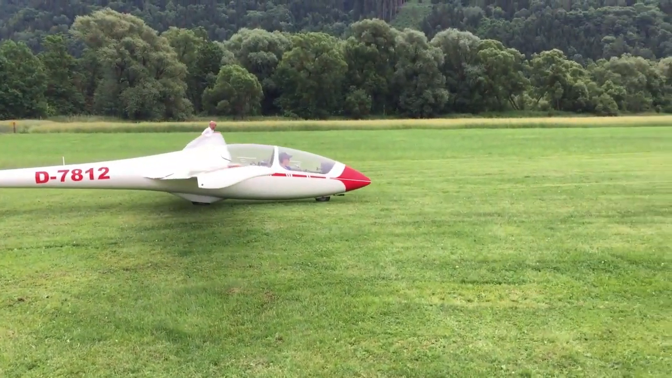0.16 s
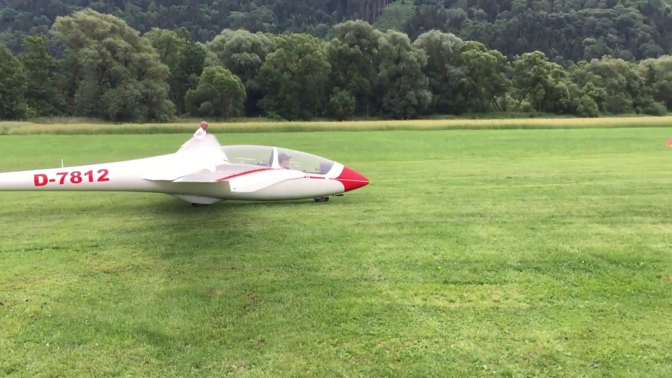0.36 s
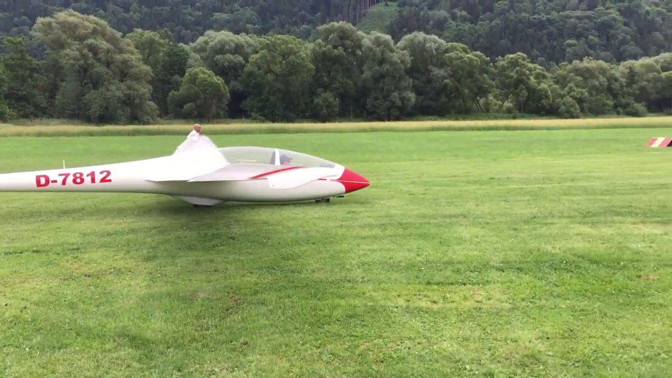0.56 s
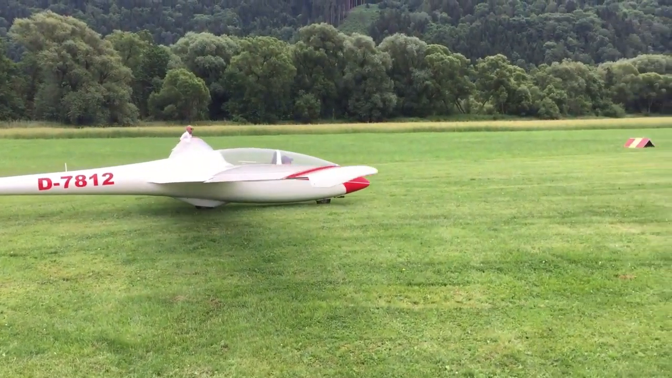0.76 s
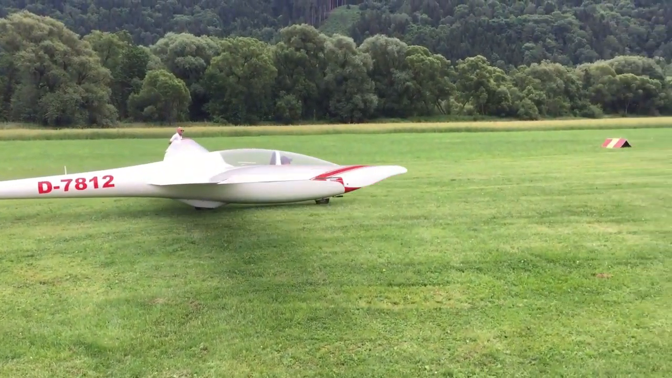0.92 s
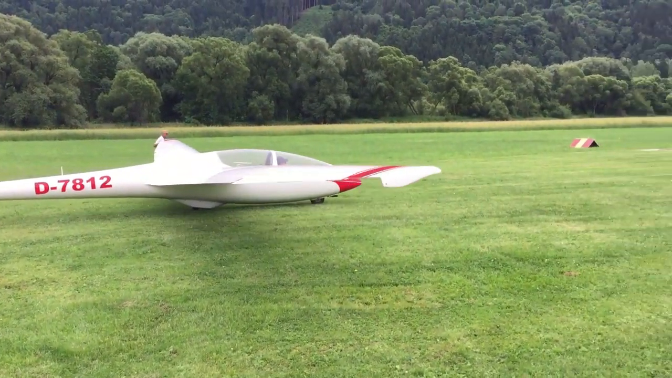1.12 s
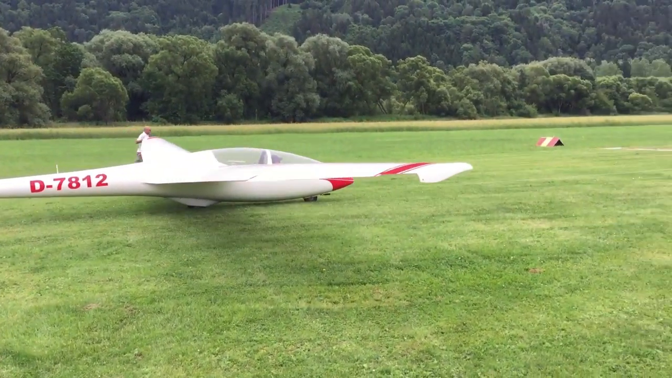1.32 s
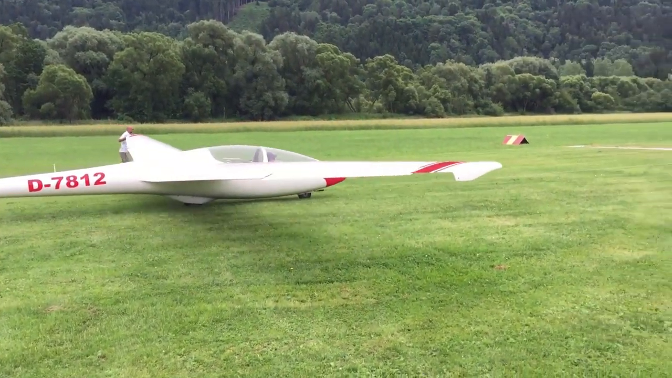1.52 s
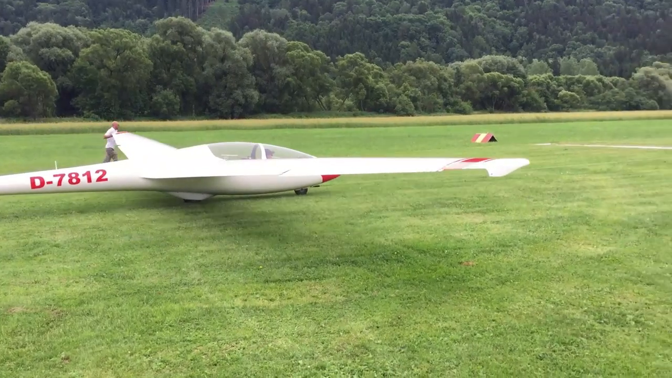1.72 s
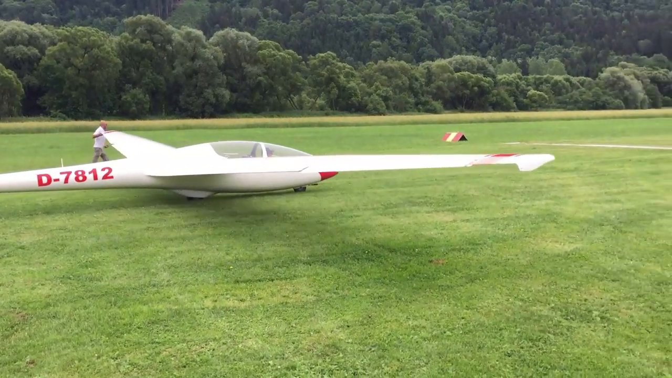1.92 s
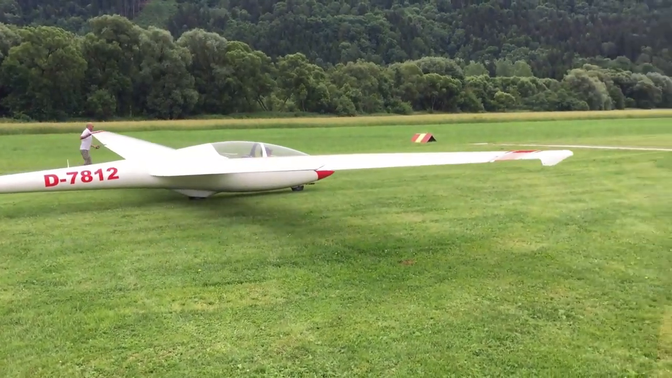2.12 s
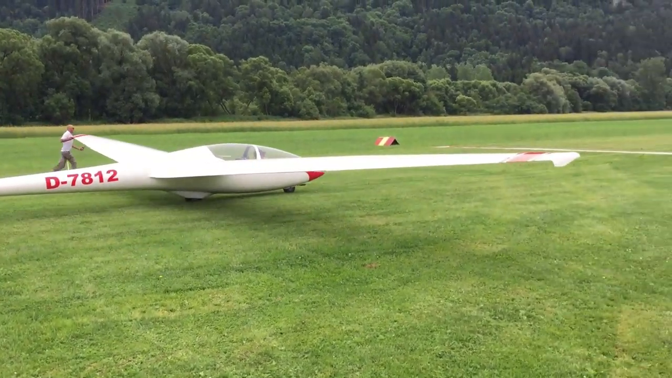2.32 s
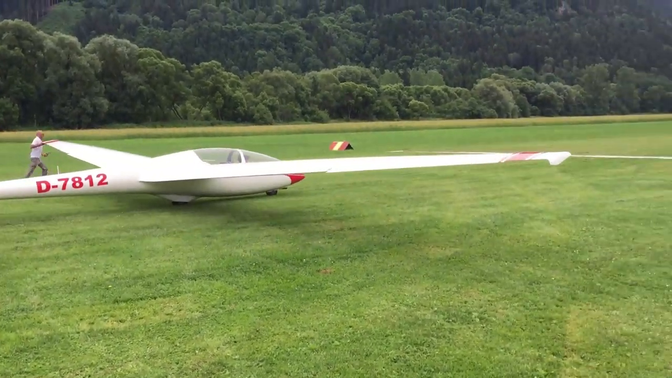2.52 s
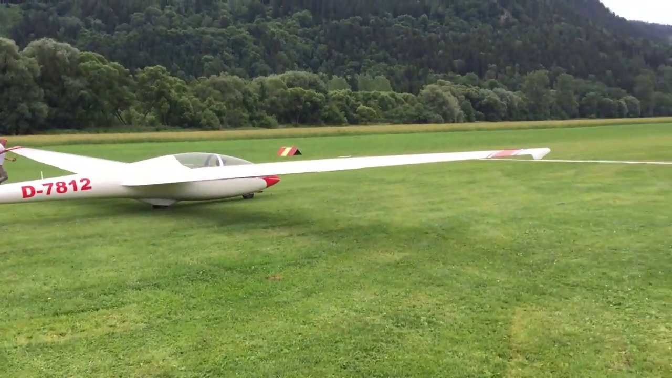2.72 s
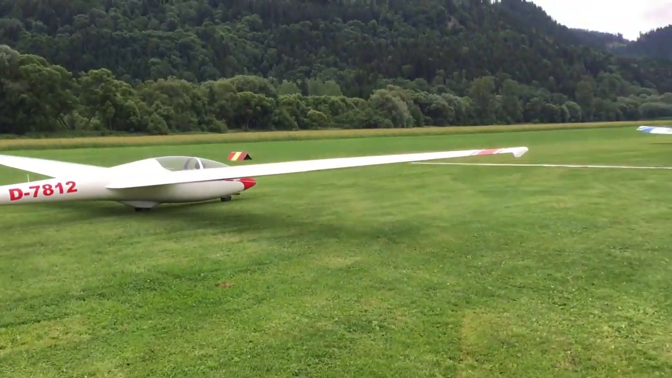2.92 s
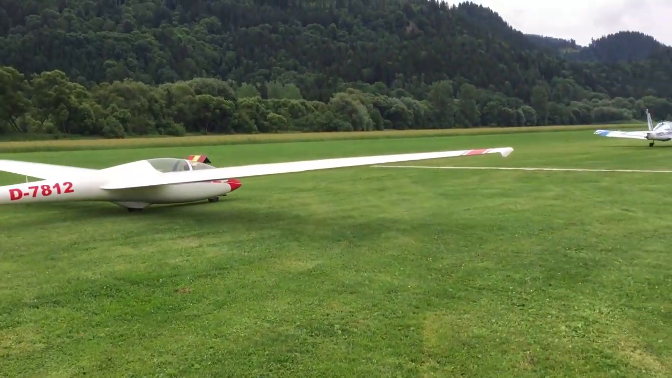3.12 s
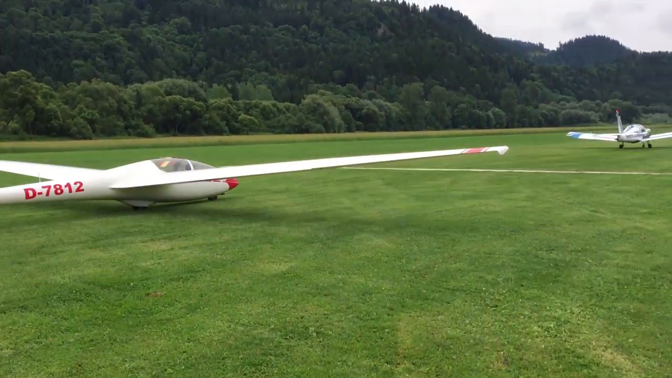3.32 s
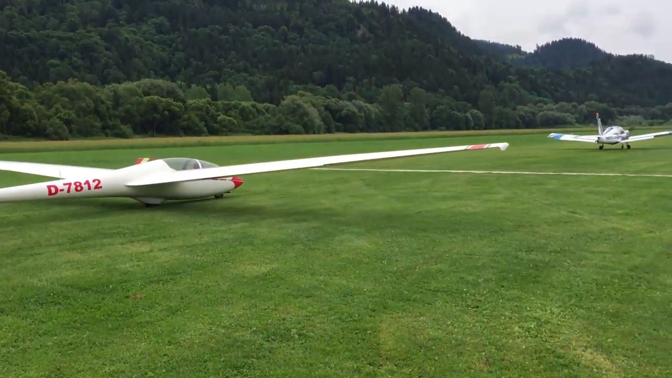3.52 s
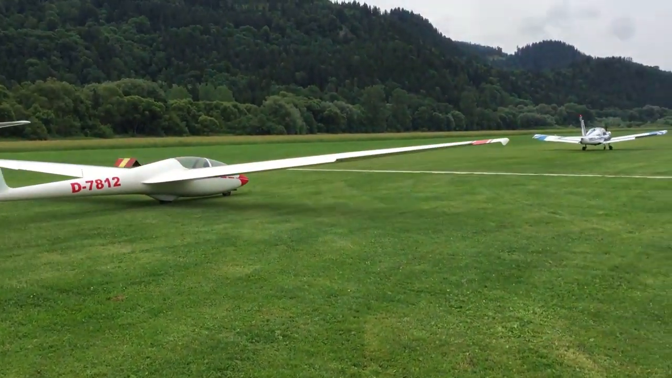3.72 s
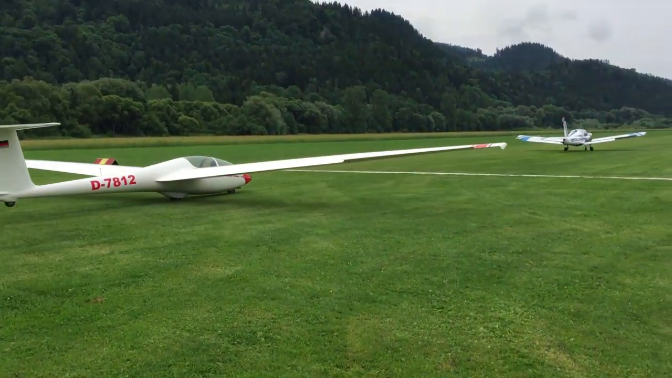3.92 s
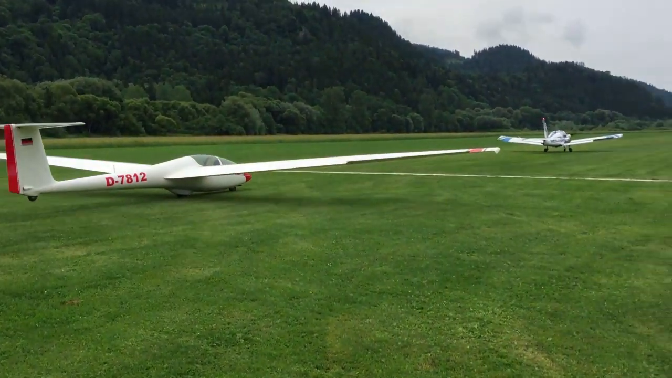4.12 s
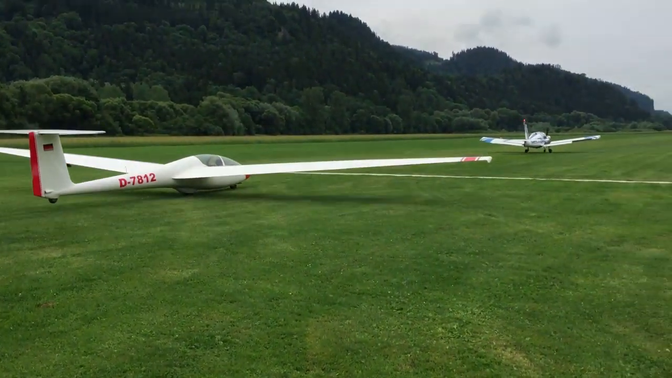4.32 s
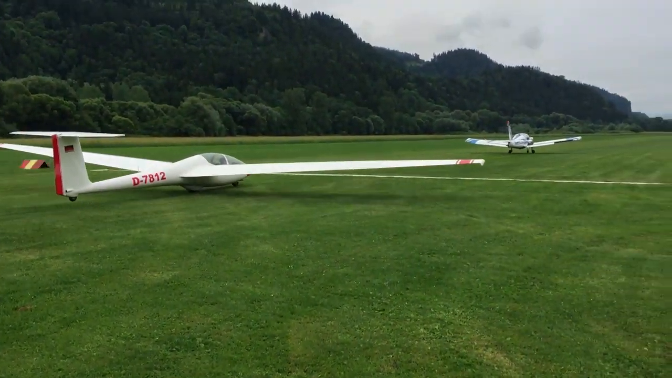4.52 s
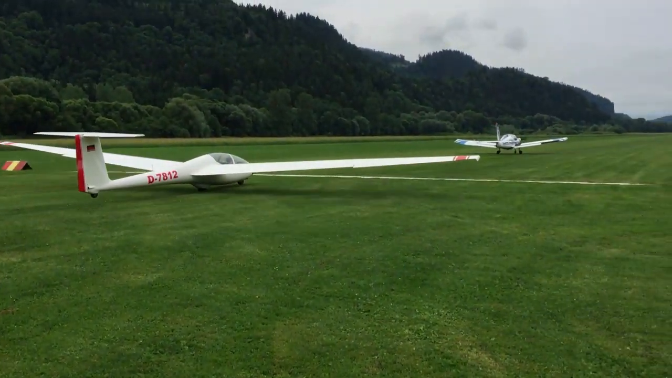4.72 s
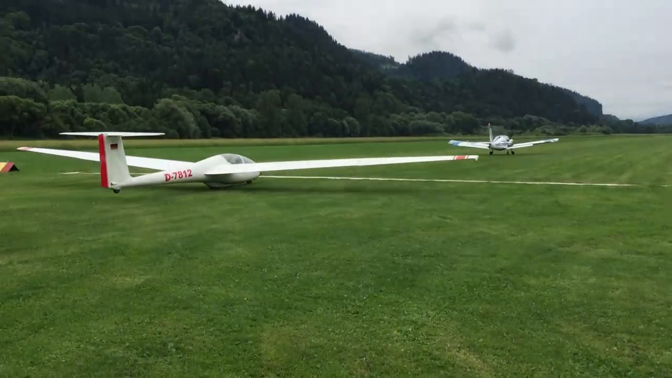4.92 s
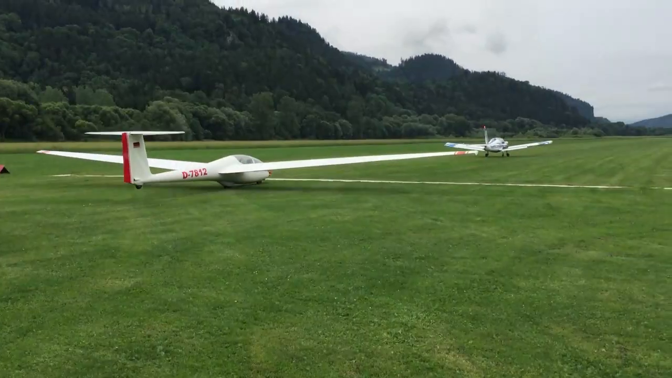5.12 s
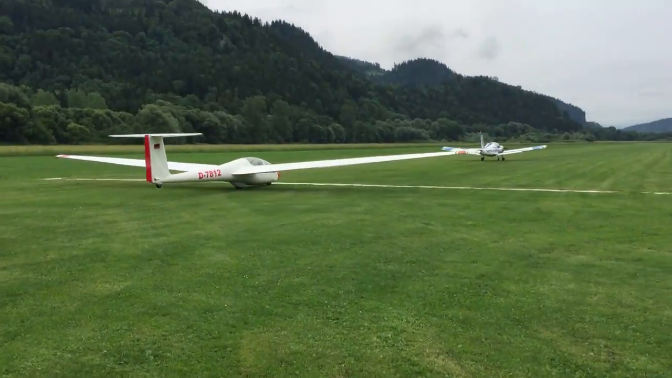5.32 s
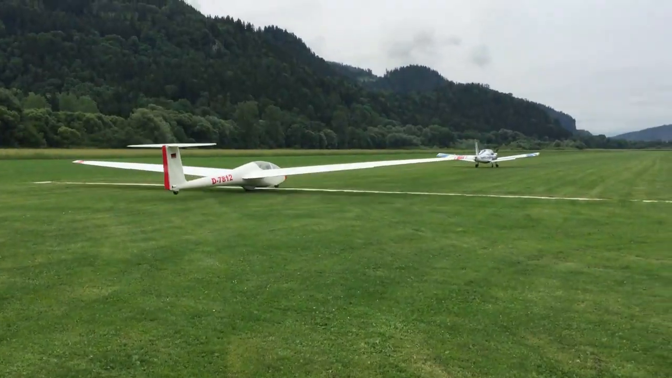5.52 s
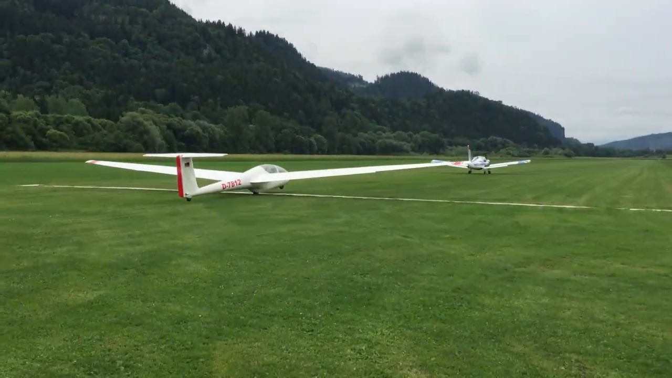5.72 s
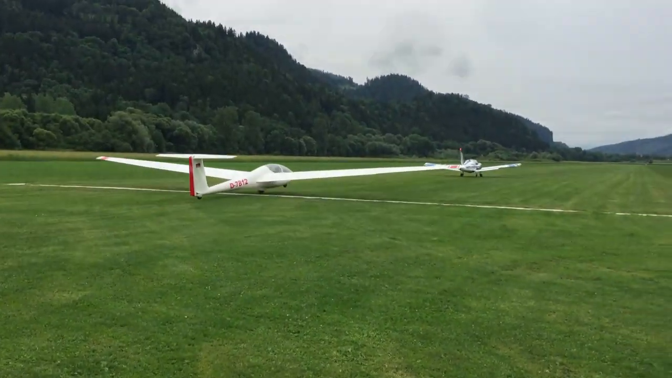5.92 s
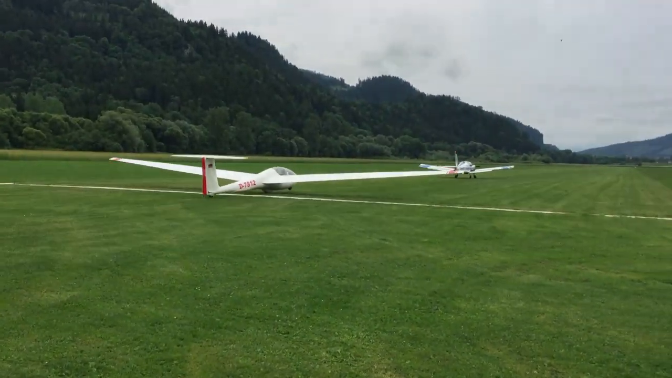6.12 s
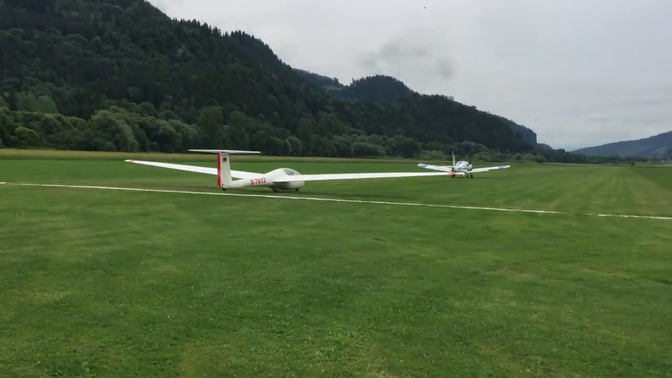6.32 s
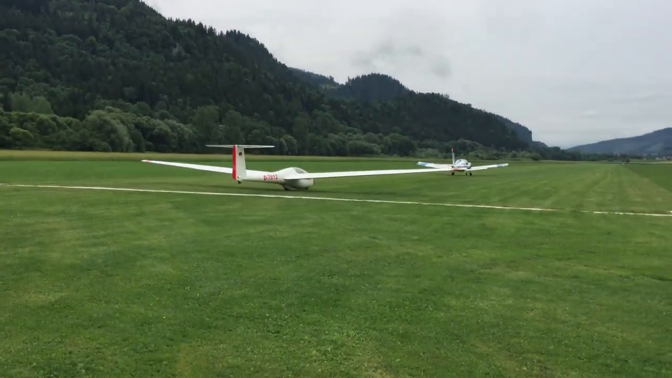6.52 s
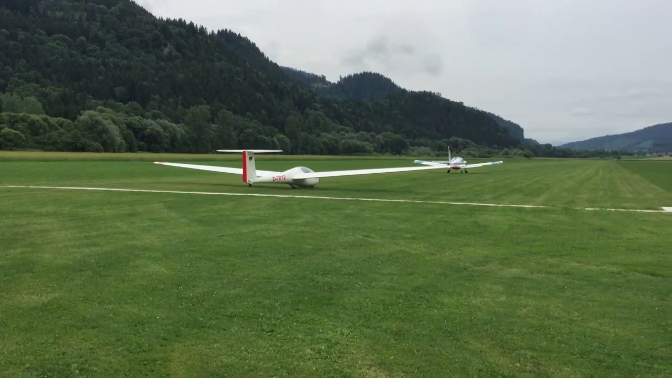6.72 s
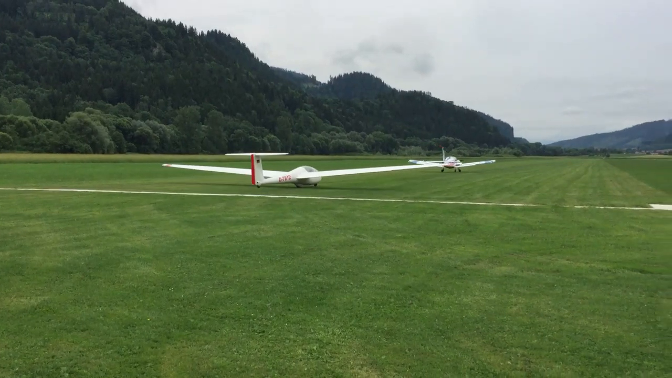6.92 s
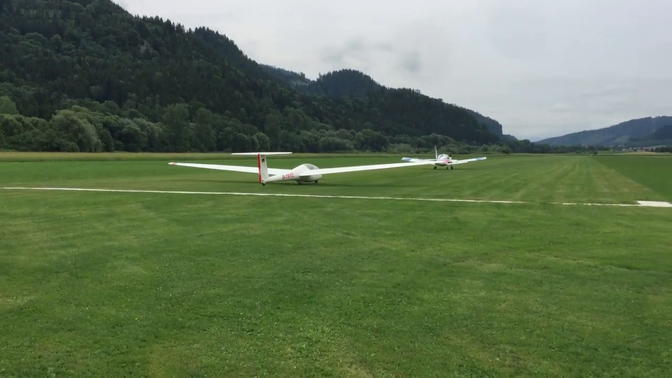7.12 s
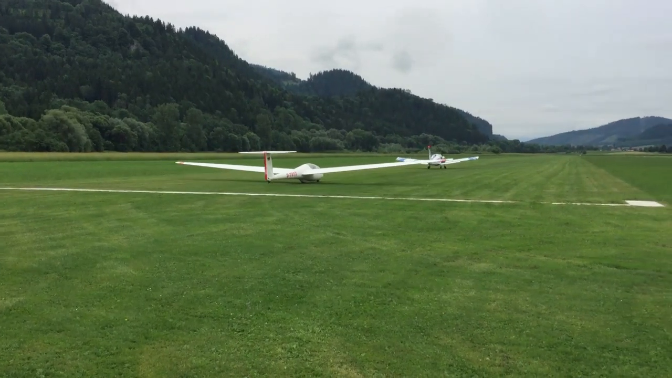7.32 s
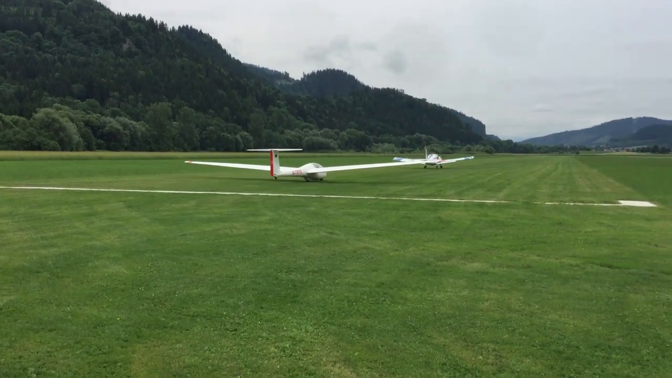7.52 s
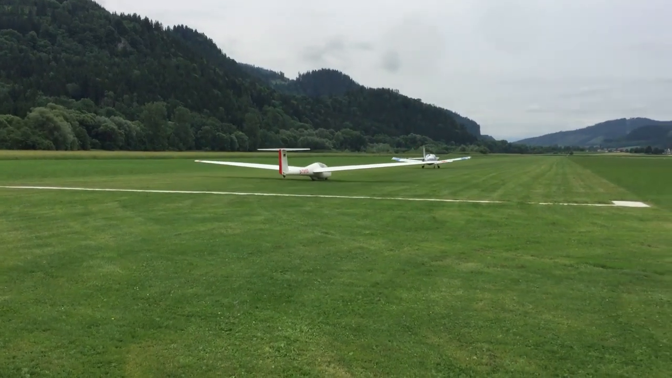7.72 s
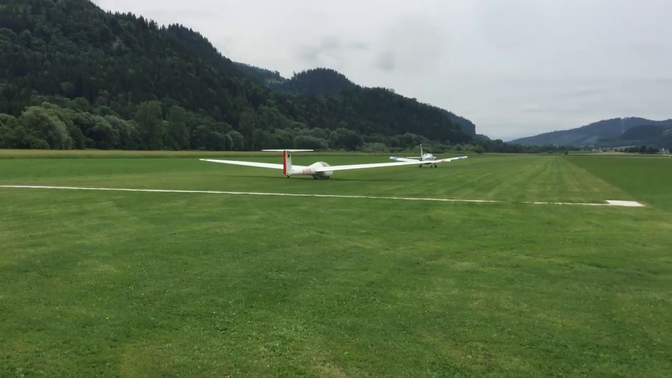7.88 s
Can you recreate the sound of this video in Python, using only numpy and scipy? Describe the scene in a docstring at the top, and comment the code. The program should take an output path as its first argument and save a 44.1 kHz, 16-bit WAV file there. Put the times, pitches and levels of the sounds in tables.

```python
"""A light aircraft at full power rolls away over a grass strip: two propeller blades and four cylinders hum
as orders of the blade rate, each blade pass tears off a burst of hiss that dulls with distance, and exhaust
noise throbs beneath. Late on, the slipstream reaches the microphone: the hum drops out and shaped noise and
falling swings rumble, pop and crack on the port. A faint dry tick and a quiet field hiss complete it."""
import sys
import numpy as np
from scipy import signal
from scipy.fft import rfft, irfft, next_fast_len
from scipy.io import wavfile
from scipy.ndimage import uniform_filter1d, map_coordinates

SR = 44100
rng = np.random.default_rng(int(sys.argv[2]) if len(sys.argv) > 2 else 0)


def dump(signal):
    """Clip the signal to [-1, 1] and save it as 16-bit WAV at the path in sys.argv[1]."""
    limited = np.clip(np.atleast_2d(signal).T, -1, 1)
    pcm = np.round(limited * 32767).astype(np.int16)
    wavfile.write(sys.argv[1], SR, pcm)


N = 350770
TOP_HZ = 15850  # band limit of the microphone

# blade hiss fading as the aircraft leaves: time_s, level_db
HISS_LEVEL = [(0, -22.5), (.33, -21), (1.2, -29.5), (1.5, -32), (1.75, -35.5), (2, -35.5), (2.35, -37.5),
              (2.9, -39), (3.3, -40), (4.5, -45.5), (6.1, -46.5), (7, -51), (7.5, -49), (7.95, -53)]


def amp(db):
    """Decibels to gain."""
    return 10 ** (np.asarray(db) / 20)


def unit(x):
    """Scale to rms 1."""
    return x / np.sqrt(np.mean(x ** 2) + 1e-20)


def curves(rows):
    """Draw one automation curve, a value per sample, for each column after the time."""
    time_s, *columns = np.transpose(rows)
    t = np.arange(N) / SR
    return [np.interp(t, time_s, column) for column in columns]


def wobble(rate):
    """A smooth random curve with rate knots a second."""
    knots = rng.standard_normal(int(N * rate / SR) + 4)
    fine = np.arange(0, len(knots) - 1, 1 / 8)
    smooth = map_coordinates(knots, [fine])
    return np.interp(np.arange(N) * rate / SR, fine, smooth)


def coloured(x, points):
    """Equalise x through a curve of (Hz, dB) points on a log frequency scale, then scale to rms 1."""
    m = next_fast_len(N + 8192)
    hz = np.fft.rfftfreq(m, 1 / SR)
    point_hz, point_db = np.transpose(points)
    gain_db = np.interp(np.log(hz + 1), np.log(point_hz + 1), point_db)
    return unit(irfft(rfft(x, m) * amp(gain_db), m)[:N])


def air(level_db):
    """The quiet floor of the open field: steady coloured noise."""
    # faint field hiss: freq_hz, gain_db
    air_colour = [(300, -30), (1000, -4), (4000, 0), (12000, -4), (16000, -10), (16500, -30)]
    return amp(level_db) * coloured(rng.standard_normal(N), air_colour)


def tick():
    """A short broad click: white noise under a fast exponential decay."""
    # faint dry tick: start_s, starting level_db
    start_s, level_db = (7.517, -43)
    t60_s = .0072
    out, t = np.zeros(N), np.arange(SR // 50) / SR
    burst = amp(level_db - 60 * t / t60_s) * rng.standard_normal(len(t))
    out[round(start_s * SR):][:len(t)] = burst
    return out


def wind():
    """Lumpy rumble and brighter flutter of the slipstream; each gust rises to a crest and falls."""
    # slipstream gusts: crest_s, rumble_db, flutter_db against the rumble, fall_db_per_s
    gust_list = [(6.36, -19.5, -31, 300), (6.39, -25.5, -19, 300), (6.475, -24, -24, 61),
                 (6.659, -22.5, -38, 150), (6.749, -13, -11, 300), (6.888, -11, -11.5, 250),
                 (6.925, -14.5, -12.5, 300), (6.968, -15.5, -3.5, 351), (7.05, -22, -12, 222),
                 (7.25, -27, -18, 21), (7.4, -24, -25, 49), (7.485, -20.5, -25, 250),
                 (7.55, -24.5, -21, 200), (7.64, -12, -6.5, 602), (7.73, -27, -38, 150),
                 (7.95, -20, -25, 105)]
    # low turbulence: freq_hz, gain_db
    rumble_colour = [(12, -45), (30, -23), (52, 8.5), (130, 0), (220, -7.5), (330, -21.5), (500, -40),
                     (900, -90)]
    # brighter turbulence: freq_hz, gain_db
    flutter_colour = [(150, -49), (300, 0), (500, 2), (900, -15.5), (1500, -32), (3000, -40), (6000, -100)]
    from_s, fade_in_s = 6.33, .014
    lull_db, lull_flutter_db = -32, -24.5  # floor between gusts; its flutter against its rumble
    rise_ratio, flutter_fall_ratio = 1.83, 1.85  # rise against fall; flutter slope against rumble slope

    t = np.arange(N) / SR
    low, high = amp(lull_db), amp(lull_db + lull_flutter_db)
    for crest_s, rumble_db, flutter_db, fall in gust_list:
        off_db = fall * np.maximum(t - crest_s, rise_ratio * (crest_s - t))
        low = np.maximum(low, amp(rumble_db - off_db))
        high = np.maximum(high, amp(rumble_db + flutter_db - flutter_fall_ratio * off_db))
    rumble = coloured(amp(2.2 * wobble(30)) * rng.standard_normal(N), rumble_colour)
    flutter = coloured(amp(4 * wobble(80)) * rng.standard_normal(N), flutter_colour)
    fade_in = np.clip((t - from_s) / fade_in_s, 0, 1)
    return fade_in * (low * rumble + high * flutter)


def cracks():
    """Dry cracks on hard pops: short bursts of noise dulled by a low-pass."""
    # cracks: start_s, starting level_db
    crack_list = [(6.471, -33), (6.873, -29), (6.9565, -24), (6.978, -32)]
    cutoff_hz, t60_s = 1700, .007
    out, t = np.zeros(N + SR), np.arange(SR // 50) / SR
    for start_s, level_db in crack_list:
        burst = amp(level_db - 60 * t / t60_s) * rng.standard_normal(len(t))
        out[round(start_s * SR):][:len(t)] += burst
    dull = signal.lfilter(*signal.butter(3, cutoff_hz, fs=SR), out[:N])
    return dull * np.sqrt(SR / 2 / cutoff_hz)  # make up the power lost to the low-pass


def pops():
    """An eddy bursts on the port: a snap, then a few swings that slow down quickly."""
    # gust pops: start_s, level_db, extra starting pitch_hz above the resting pitch, swell_s to the crest,
    # snap_db gain against the swing, direction of the first swing (-1 suck, 1 push)
    pop_list = [(6.3375, -7, 294, .0052, -13, -1), (6.4695, -20, 400, .0057, -7, 1),
                (6.534, -23, 300, .005, -14, 1), (6.56, -19, 200, .006, -22, 1),
                (6.752, -7, 800, .0052, -42, -1), (6.801, -14, 290, .0035, -26, -1),
                (6.8712, -8, 375, .0045, -10, 1), (6.9185, -20, 607, .003, -9, -1),
                (6.927, -16, 520, .0045, -6, 1), (6.9535, -1.5, 487, .0044, -18, -1),
                (6.977, -18, 540, .004, -7.5, -1), (7.037, -19, 493, .0035, -20, -1),
                (7.061, -16, 420, .006, -12, 1), (7.113, -27, 400, .004, -10, 1),
                (7.378, -15.5, 190, .006, -28, 1), (7.546, -22, 300, .005, -12, 1),
                (7.63, -6.5, 342, .0072, -21, -1), (7.666, -29, 500, .0035, -6, -1),
                (7.724, -18.5, 320, .012, -30, 1)]
    rest_hz, slowing_s = 45, .0017
    out, t = np.zeros(N + SR), np.arange(SR // 10) / SR
    for start_s, level_db, extra_hz, swell_s, snap_db, direction in pop_list:
        pitch_hz = rest_hz + extra_hz / (1 + t / slowing_s)
        swing_envelope = (t / swell_s * np.exp(1 - t / swell_s)) ** 2
        swing = swing_envelope * np.sin(2 * np.pi * np.cumsum(pitch_hz) / SR)
        snap_envelope = (t / .0015 * np.exp(1 - t / .002)) ** 2
        snap = snap_envelope * np.sin(2 * np.pi * np.cumsum(2.4 * pitch_hz) / SR)
        out[round(start_s * SR):][:len(t)] += direction * amp(level_db) * (swing + amp(snap_db) * snap)
    return out[:N]


def roar(angle):
    """Low exhaust noise, throbbing with each firing."""
    # exhaust roar: time_s, level_db
    roar_level = [(0, -35), (1, -36.5), (3, -38), (4, -41), (6.3, -43), (6.5, -45), (7.95, -40.5)]
    # exhaust tone: freq_hz, gain_db
    roar_colour = [(15, -42), (35, -9), (60, -0.5), (150, 0), (220, -2), (270, -5), (330, -13), (450, -24),
                   (700, -18.5), (1500, -78)]
    throb = (1 + .15 * np.cos(angle - 2.3)) * amp(.57 * wobble(20))
    noise = coloured(throb * rng.standard_normal(N), roar_colour)
    return amp(curves(roar_level)[0]) * noise


def patchy(x, low_db, high_db, airy_db):
    """Turbulent air on the path makes bands swell and sink, the treble most."""
    # moments of a band lifted or sunk: centre_s, half_length_s, centre_hz, slide_hz_per_s, lift_db,
    # width (natural log of the frequency ratio)
    swell_list = [(2, 0.11, 3300, 0, 7.5, 0.34), (2.21, .12, 3500, 0, 5, 0.29),
                  (2.3, .06, 4500, 0, 7.5, 0.13), (1.46, .12, 3700, 0, 3, 0.34),
                  (0.91, 0.23, 6000, 0, 2, 0.075), (2.714, 0.19, 3170, -1500, 10, 0.3),
                  (3.01, 0.083, 2550, -500, 9, 0.17), (2.96, .17, 1200, -1500, 6, 0.22),
                  (3.396, 0.14, 2930, -500, 9.5, 0.13), (3.3, 0.14, 4500, 0, 4.5, 0.097),
                  (3.3, 0.11, 6600, 0, 6, .12), (3.55, 0.085, 900, 0, 3, .2), (4.1, 0.25, 1250, 0, 3, .2),
                  (5.2, .06, 5500, 0, 4, 0.33), (4.75, 0.13, 3350, 0, 4.5, .1),
                  (4.85, 0.092, 1200, 0, 5.5, 0.18), (4.86, 0.071, 2000, 0, 9, .1),
                  (5.36, .2, 3250, 1194, 6, 0.11), (5.8, 0.21, 1300, 0, 4, 0.16), (7.7, .1, 3500, 0, 3, .1),
                  (6.1, 0.25, 3140, 800, 4.5, .13), (5.5, 0.13, 1000, 0, 3, .15),
                  (2.15, 0.23, 1300, 0, -5, 0.38), (3.27, 0.11, 1800, 0, -5, 0.45)]
    hz, s, spectrum = signal.stft(x, SR, nperseg=256)
    hz = hz[:, None]

    def random_field(bins, frames):
        """Random gains smoothed over frequency and time."""
        field = uniform_filter1d(rng.standard_normal(spectrum.shape), size=bins, axis=0)
        return unit(uniform_filter1d(field, size=frames, axis=1))

    depth_db = np.linspace(low_db, high_db, len(spectrum))[:, None]
    gain_db = depth_db * random_field(4, 30)
    gain_db = gain_db + airy_db * hz / TOP_HZ * random_field(24, 24)
    for centre_s, half_s, centre_hz, slide, lift_db, width in swell_list:
        path_hz = np.maximum(centre_hz + slide * (s - centre_s), 100)
        band = np.exp(-(np.log((hz + 1) / path_hz) / width) ** 2)
        gain_db = gain_db + lift_db * band * np.exp(-((s - centre_s) / half_s) ** 2)
    return signal.istft(spectrum * amp(gain_db), nperseg=256)[1][:N]


def rasp(angle):
    """A burst of crackling hiss for each blade pass, one blade the louder, over steady field echoes."""
    # moments when each colour below holds alone: time_s
    stages = [.5, 2, 2.9, 3.7, 5.4, 7.2]
    # hiss colours, near to far, as the aircraft recedes and the ground echo moves its notches:
    # freq_hz, gain_db
    close = [(210, -20), (360, -11.5), (488, -28), (512, -14), (1400, -2.5), (1620, -1.5), (1780, -15),
             (2300, 0), (4810, -7), (5740, -3), (13200, -20), (15500, -24.5), (16500, -49)]
    leaving = [(210, -9), (360, -1.5), (641, 1), (987, 2.5), (1450, 0.5), (1730, -5.5), (2750, -1),
               (3670, -4), (4810, -8.5), (5740, -3.5), (13200, -16.5), (15700, -22), (16500, -46.5)]
    early_middle = [(210, -37), (360, 2), (651, 2), (841, -11), (1160, -2.5), (1700, 3), (2000, -3.5),
                    (2620, -1.5), (4970, -10), (6420, -5.5), (14800, -22), (15700, -31), (16500, -51)]
    downfield = [(210, -39), (360, -5.5), (564, 4), (789, -26), (956, -1.5), (1250, 5), (2060, -5.5),
                 (2790, -3), (3850, -7.5), (6730, -8.5), (13800, -20.5), (15700, -27), (16500, -48)]
    far = [(210, -50), (360, -58), (396, -22), (450, -9), (651, -4.5), (1100, 4), (1760, -1.5), (3550, -3),
           (4890, -10.5), (6840, -6.5), (14100, -24), (15700, -34), (16500, -56)]
    distant = [(530, -19), (900, -8.5), (1110, -4), (1740, -6.5), (2530, -15), (2970, -11), (10000, -28),
               (14400, -56), (16500, -65)]
    burst_lag = 2.53  # radians behind the pressure crest
    sharp_full, sharp_lost_per_db, sharp_least = 2, .05, .95  # distance smears the bursts
    echo_db, echo_grows, echo_top_db = -24.5, .66, -8.5  # at full hiss; dB gained per dB lost; ceiling
    echo_hz = 9500  # the echoes are duller above this

    level_db, = curves(HISS_LEVEL)
    lost_db = level_db.max() - level_db
    steady_db = np.minimum(echo_db + echo_grows * lost_db, echo_top_db)
    sharp = np.maximum(sharp_full - sharp_lost_per_db * lost_db, sharp_least)

    turn = angle - burst_lag
    blade = np.round(turn / (2 * np.pi)).astype(int)
    random_db = .4 * rng.standard_normal(blade.max() + 1)[blade]
    uneven_db = np.minimum(.7 + .04 * lost_db, 1.2) * (-1.) ** blade
    leaning = turn + .2 * np.cos(turn)  # quick rise, slower fall
    gate = amp(random_db - uneven_db) * np.exp(sharp * (np.cos(leaning) - 1))

    crackle = amp(.7 * wobble(5000)) * rng.standard_normal(N)
    echoes = signal.lfilter(*signal.butter(1, echo_hz, fs=SR), rng.standard_normal(N))
    bursts = gate * crackle + amp(steady_db) * echoes
    # even out the running power so that the level curve alone sets the loudness
    bursts = bursts / np.sqrt(uniform_filter1d(gate ** 2 + amp(2 * steady_db), size=SR // 4))

    shares = curves(np.column_stack([stages, np.eye(len(stages))]))  # crossfade between colours
    colours = close, leaving, early_middle, downfield, far, distant
    hiss = sum(share * coloured(bursts, colour) for share, colour in zip(shares, colours))
    return amp(level_db) * patchy(hiss, low_db=1.1, high_db=2, airy_db=3)


def hum(angle):
    """Propeller and engine tones: cosines at orders of the blade rate, slightly unsteady in level and phase."""
    # hum levels: time_s, first_db, second_db, third_db, fourth_db (harmonics of the blade rate), side_db
    hum_levels = [(0, -22, -60, -37, -49, -47), (1, -23, -62, -35, -48.5, -49.5),
                  (1.6, -23.5, -49, -32.5, -47.5, -47), (2.1, -23.5, -53, -36, -52.5, -47),
                  (2.5, -24, -35.5, -33.5, -51, -47), (2.95, -24, -46, -35, -48.5, -48),
                  (3.3, -26, -40, -36, -48, -44.5), (4, -27, -35, -37, -53.5, -44),
                  (4.6, -26.5, -39, -39.5, -57, -47.5), (5.1, -26.5, -35, -39, -56.5, -48.5),
                  (5.8, -27.5, -39.5, -41, -57, -48), (6.3, -28, -37.5, -41, -58, -42)]
    # lag of each harmonic behind the crest: time_s, first_rad, second_rad, third_rad, fourth_rad
    harmonic_lags = [(1.5, 0, .3, -.1, -1.3), (2.6, 0, .7, .95, -1.3)]
    # lines of uneven cylinders at quarters of the blade rate: order, level_db against the side level
    side_orders = [(3 / 4, -4), (5 / 4, -9), (6 / 4, -8.5), (7 / 4, -2), (9 / 4, 0.43), (10 / 4, -15),
                   (11 / 4, -5), (14 / 4, -29), (15 / 4, -24), (17 / 4, -24), (18 / 4, -30),
                   (19 / 4, -24.5)]
    buzz_orders = np.arange(10, 19) / 2  # crankshaft orders above the hum
    buzz_db = -31  # each, against the blade hiss
    gone_s, fade_s = 6.39, .047  # fully faded at, fade length

    *harmonics, side_db = curves(hum_levels)
    orders = list(zip(range(1, 5), harmonics, curves(harmonic_lags)))
    orders += [(k, side_db + db, rng.uniform(0, 2 * np.pi)) for k, db in side_orders]
    orders += [(k, curves(HISS_LEVEL)[0] + buzz_db, .3 * k) for k in buzz_orders]

    tones = 0
    for k, level_db, lag in orders:
        flicker_db = .35 * np.sqrt(k) * wobble(12)
        flicker_db = flicker_db + (k % 1 > 0) * 1.8 * wobble(4)  # fractional orders waver more
        waver = .022 * k * wobble(10)  # radians
        tones = tones + amp(level_db + flicker_db) * np.cos(k * angle - lag + waver)
    fade_out = np.clip((gone_s - np.arange(N) / SR) / fade_s, 0, 1)
    return np.sqrt(2) * tones * fade_out  # root 2 makes the levels rms


def scene():
    """Aircraft and wind at one microphone; the strongest gusts flatten softly on the port."""
    # blade passes: time_s, rate_hz
    blade_rate = [(0, 79.43), (.6, 81.08), (1.5, 82.04), (3, 82.2), (3.5, 81.86), (4.3, 82.22), (5, 81.73),
                  (5.5, 82.07), (6.3, 81.56), (6.7, 81.9)]
    start_angle = 2.455  # radians; one blade pass is a full cycle
    port_limit = .6  # pressure ceiling of the gusts
    angle = start_angle + 2 * np.pi * np.cumsum(curves(blade_rate)[0]) / SR
    gusts = wind() + cracks() + pops()
    gusts = gusts / (1 + np.abs(gusts / port_limit) ** 6) ** (1 / 6)
    aircraft = roar(angle) + rasp(angle) + hum(angle)
    return (air(level_db=-70) + tick() + gusts + aircraft)[None]


def record(dry):
    """The microphone colours the treble; nothing is kept above the band limit."""
    # microphone treble response: freq_hz, gain_db
    mic_colour = [(4000, 0), (5600, -1), (6800, -1), (7700, -2), (9000, 1.5), (9800, 1), (10400, -4),
                  (11000, 0), (12300, 0.5), (13200, 0.5), (14600, 1), (15700, 1)]
    m = next_fast_len(N + 8192)
    hz = np.fft.rfftfreq(m, 1 / SR)
    point_hz, point_db = np.transpose(mic_colour)
    response = amp(np.interp(hz, point_hz, point_db)) * (hz < TOP_HZ)
    return irfft(rfft(dry, m) * response, m)[:, :N]


dry = scene()
out = record(dry)
dump(out)
```